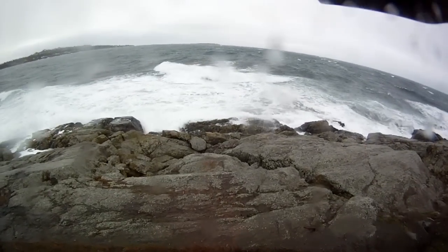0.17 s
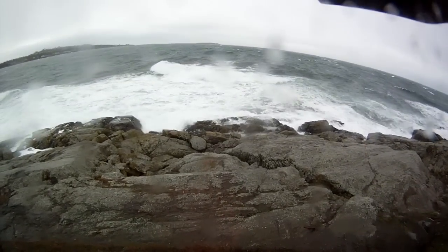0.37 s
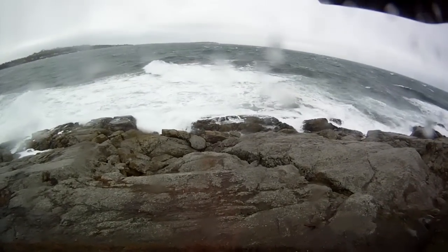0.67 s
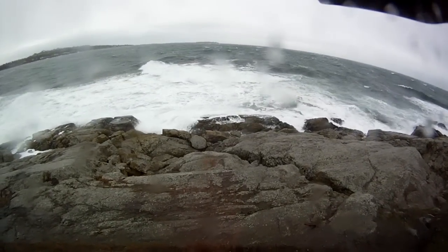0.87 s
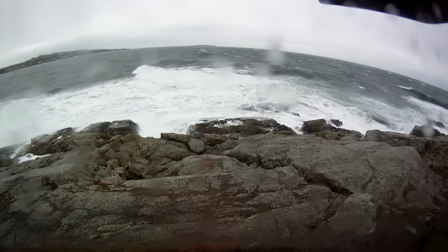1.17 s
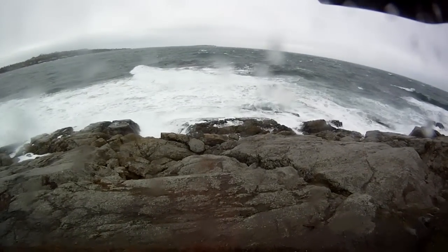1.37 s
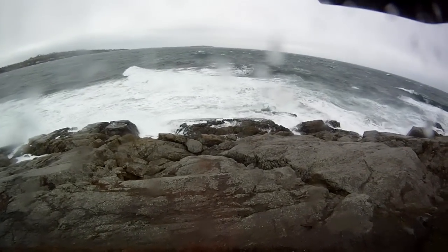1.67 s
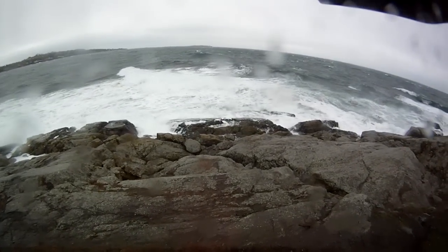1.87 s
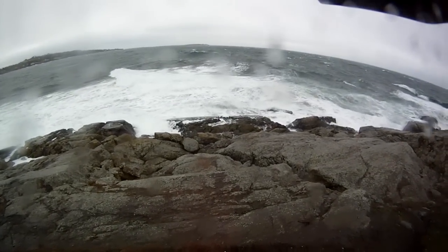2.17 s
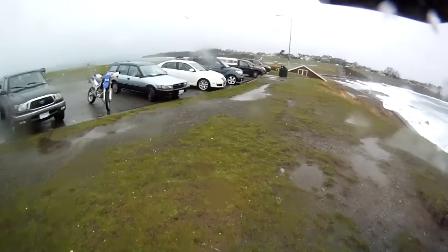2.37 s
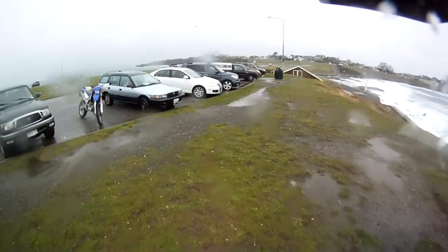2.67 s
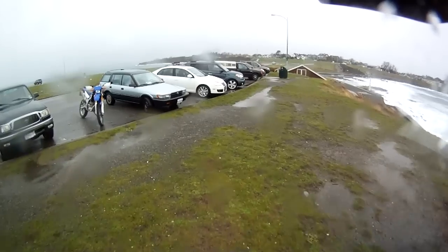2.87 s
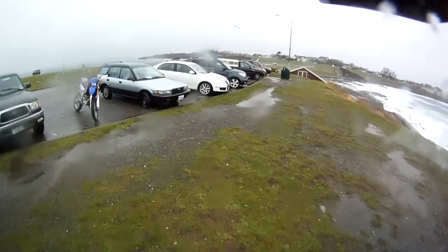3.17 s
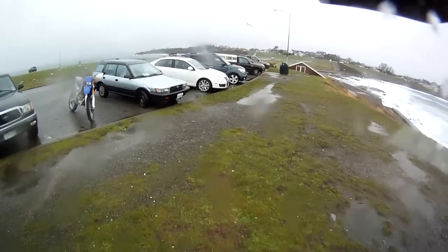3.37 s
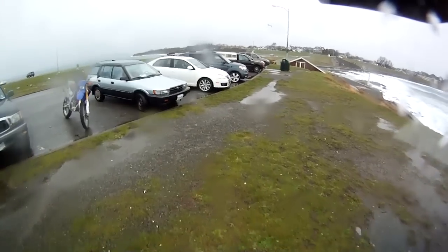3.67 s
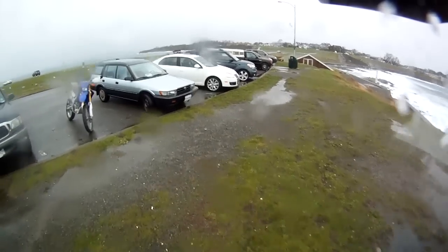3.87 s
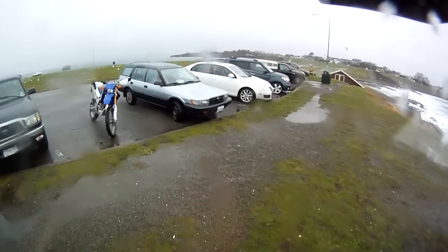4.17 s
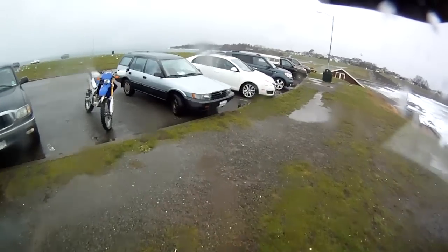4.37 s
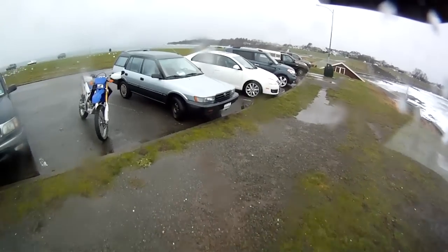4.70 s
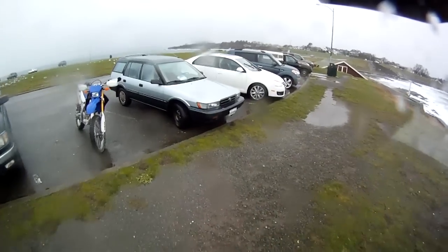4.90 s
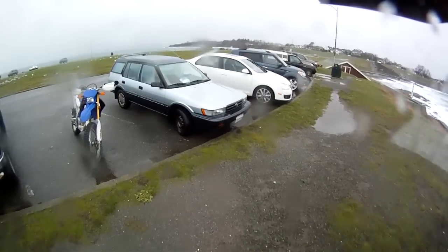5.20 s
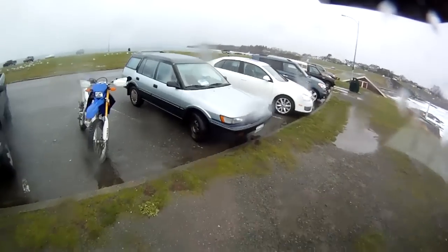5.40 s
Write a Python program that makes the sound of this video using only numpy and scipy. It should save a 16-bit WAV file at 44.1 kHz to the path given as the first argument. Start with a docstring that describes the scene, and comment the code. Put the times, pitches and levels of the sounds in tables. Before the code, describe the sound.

Strong wind rumbles and thumps on the microphone over roaring surf, with hissing spray and a few drops ticking close by.

```python
"""A rocky shore in a storm, heard through a small camera in a wet housing, on the rocks, then on the bank.
Wind thumps and rushes on the microphone, surf roars behind it, spray and bursts of rain hiss,
and a few drops tick on the housing. The recorder holds each sample at a low rate,
which mirrors the whole sound into a thin, high sizzle."""
import sys
import numpy as np
from scipy import signal
from scipy.fft import rfft, irfft
from scipy.io import wavfile
from scipy.ndimage import uniform_filter1d

SR = 44100
rng = np.random.default_rng(int(sys.argv[2]) if len(sys.argv) > 2 else 0)


def dump(signal):
    """Clip the signal to [-1, 1] and save it as 16-bit WAV at the path in sys.argv[1]."""
    limited = np.clip(np.atleast_2d(signal).T, -1, 1)
    pcm = np.round(limited * 32767).astype(np.int16)
    wavfile.write(sys.argv[1], SR, pcm)


N = 244314
TIME = np.arange(N) / SR
FREQUENCIES = np.fft.rfftfreq(N, 1 / SR)

# the average wind on the microphone (time [s], rumble [dB], rush [dB])
WIND_LEVELS = [(0.0, -21.5, -21), (0.11, -14, -22), (0.14, -20.5, -31), (0.26, -18.5, -24.5),
               (2.33, -18.5, -23.5), (2.41, -24.5, -28), (2.53, -21.5, -26), (4.55, -23.5, -28),
               (4.7, -21.5, -26.5), (5.54, -24, -26.5)]
# big swirls of air that hit or leave a lull (time [s], length [s], rumble change [dB], rush change [dB])
BIG_SWIRLS = [(0.11, 0.018, 1.5, -3), (0.376, 0.036, 4.5, 3), (0.696, 0.16, 2, 2.5),
              (0.927, 0.031, -5, 3.5), (0.998, 0.031, 4, 1), (1.198, 0.024, -4.5, -5.5),
              (1.324, 0.016, 4.5, 6.5), (1.7, 0.084, -2.5, -1), (1.87, 0.047, 1.5, 0), (2.04, 0.04, 3, 2),
              (2.277, 0.044, 1.5, -2.5), (2.854, 0.045, 0, 3.5), (3.185, .035, 3.5, 1.5),
              (3.284, 0.042, -7, 2.5), (3.48, 0.12, 2, 3), (3.68, 0.11, -4.5, -2), (3.923, .025, 2, 2.5),
              (4.838, 0.023, 5.5, 5.5), (5.04, 0.015, 5, -4), (5.196, 0.022, -1, 5)]
# short, hard gusts (time [s], length [s], level [dB])
GUSTS = [(0.087, 0.022, -25), (0.228, 0.014, -28), (4.857, 0.019, -26.5)]
# the sea from the rocks, then in three calm stretches from the bank (time [s], surf [dB], spray [dB])
SEA_FROM_ROCKS = [(0.0, -31, -40.5), (0.1, -36, -40.5), (0.12, -39, -51), (0.2, -39, -44),
                  (0.4, -31.5, -40), (0.69, -32.5, -44.5), (1.44, -32.5, -41), (2.34, -33.5, -45),
                  (2.37, -35.5, -46)]
SEA_FROM_BANK = [
    [(2.39, -38, -50), (2.394, -42, -48), (2.62, -43, -56.5)],
    [(3.6, -44, -55.5), (4.762, -40.5, -56.5), (4.78, -41, -55)],
    [(4.94, -42, -57), (5.032, -41, -52.5), (5.54, -38, -50.5)],
]
# bursts of fine rain (start [s], hold [s], hiss level [dB])
RAIN_BURSTS = [(2.645, 0.83, -52), (2.65, 0.016, -54.5), (3.053, 0.02, -52), (3.195, 0.011, -51),
               (3.314, 0.03, -51), (5.373, 0.08, -57)]
# drops on the housing (time [s], level [dB], splat length [s], knock boost [dB], tick boost [dB])
DROPS = [(1.0955, -40, .0015, 9, 5), (1.1455, -28, .0018, 11, -11), (1.2275, -31, .003, 12, -14),
         (1.5645, -36, .0016, 12, 0), (1.8572, -43, .0012, 0, 2), (2.3765, -37, .001, 0, 1),
         (3.7773, -45, .0012, -3, -2), (3.8357, -49, .001, 0, 0)]
# the tones the housing rings with (frequency [Hz], level [dB], time to fade by 60 dB [s])
HOUSING_TONES = [(2350, 0, .008), (4850, 0, .009), (5400, -3, .004)]
# the colour of each noise: how strong it is from low to high (frequency [Hz], level [dB])
RUMBLE_COLOUR = [(15, -14), (28, -4), (50, -0.5), (85, -1), (130, -3), (190, -5.5), (260, -18), (450, -43)]
RUSH_COLOUR = [(120, -22), (190, -1), (250, 0.5), (360, -3), (480, -7), (650, -16), (1000, -24),
               (2000, -36)]
GUST_COLOUR = [(100, -4), (300, 0), (600, -5), (1400, -8), (1900, -19), (3000, -32), (5000, -48)]
SURF_COLOUR = [(350, -5), (600, 2.5), (750, 0), (1100, -1.5), (1500, -6.5), (2000, -11.5), (3000, -19.5),
               (4200, -28), (5800, -34.5)]
SPRAY_COLOUR = [(1200, -1.5), (2000, 0.5), (2600, 2.5), (3300, 3), (3650, -1), (4100, -12), (4600, -11.5),
                (5050, -17.5), (5400, -11.5), (5900, -17.5)]
RAIN_COLOUR = [(1500, -16), (3000, -3), (4200, 2.5), (4700, -4.5), (5050, -13), (5400, -2), (5900, -11.5)]
SPLAT_COLOUR = [(1600, -9), (2300, 0), (3400, -2), (4500, -10), (5800, -13)]


def wind(small_swirls, flutter_db=0.5):
    """Big swirls of air thump on the microphone; small ones rush and flutter round the housing."""
    rumble_db, rush_db = curves(WIND_LEVELS)
    for time, length, rumble_change_db, rush_change_db in BIG_SWIRLS:
        rumble_db += rumble_change_db * swell(time, length)
        rush_db += rush_change_db * swell(time, length)
    rush_db += flutter_db * small_swirls
    rumble = from_db(rumble_db + 0.02) * steadied(noise(RUMBLE_COLOUR), span_s=0.11)
    rush = from_db(rush_db - 1.5) * steadied(noise(RUSH_COLOUR), span_s=0.27)
    return rumble + rush


def gusts():
    """Each hard gust tears at the housing for a moment."""
    loudness = sum(from_db(db) * swell(time, length) for time, length, db in GUSTS)
    return loudness * noise(GUST_COLOUR)


def surf(level_db, churn_db=0.55):
    """White water churns and roars on the rocks."""
    return from_db(level_db + churn_db * wobble(25)) * noise(SURF_COLOUR)


def spray(level_db, small_swirls, flutter_db=1.0):
    """Wet air hisses past, pulsing with the small swirls of wind."""
    return from_db(level_db + flutter_db * small_swirls) * noise(SPRAY_COLOUR)


def rain(attack_s=0.02, fade_s=0.085, spray_db=6.5, roar_db=12, flutter_db=1.5):
    """Fine rain arrives at once, holds and dies away: a bright hiss that brings spray and roar with it."""
    power = 0
    for start, hold, db in RAIN_BURSTS:
        corners = start + np.cumsum([0, attack_s, hold, fade_s])
        burst = from_db(db) * np.interp(TIME, corners, [0, 1, 1, 0])
        power += burst ** 2
    hiss = noise(RAIN_COLOUR)
    wet_air = from_db(spray_db) * noise(SPRAY_COLOUR)
    roar = from_db(roar_db) * noise(SURF_COLOUR)
    flutter = from_db(flutter_db * wobble(16))
    return np.sqrt(power) * flutter * (hiss + wet_air + roar)


def drops():
    """Drops splat on the housing: big ones knock its lowest tone, small hard ones tick the upper two."""
    splats, knocks, ticks = np.zeros((3, N))
    for time, db, length, knock_db, tick_db in DROPS:
        age = np.maximum(TIME - time, 0) / length
        splat = np.sqrt(2 * np.e) * age * np.exp(-age ** 2)   # rises to 1, then fades
        splats += from_db(db) * splat
        impact = int((time + length / 2) * SR)
        knocks[impact] = from_db(db + knock_db)
        ticks[impact] = from_db(db + tick_db)
    ringing = 0
    for clicks, (hz, db, fade_s) in zip((knocks, ticks, ticks), HOUSING_TONES):
        ringing += from_db(db) * ring(clicks, hz, fade_s)
    return splats * noise(SPLAT_COLOUR) + ringing


def ring(clicks, hz, fade_s):
    """Each click starts a pure tone that fades by 60 dB in fade_s seconds."""
    decay = from_db(-60 / (fade_s * SR))
    angle = 2 * np.pi * hz / SR
    return signal.lfilter([0, np.sin(angle)], [1, -2 * decay * np.cos(angle), decay ** 2], clicks + 1e-18)


def from_db(db):
    """Turn decibels into a number to multiply by."""
    return 10 ** (np.asarray(db) / 20)


def unit_level(sound):
    """Scale a sound so that its average power is 1."""
    return sound / np.sqrt(np.mean(sound ** 2) + 1e-20)


def curves(rows):
    """Join a table's points with straight lines: one curve for each level column."""
    times, *columns = np.transpose(rows)
    return [np.interp(TIME, times, column) for column in columns]


def swell(time, length):
    """A smooth rise to 1 and back around one moment."""
    return np.exp(-((TIME - time) / length) ** 2)


def wobble(rate_hz):
    """A smooth random curve that changes about rate_hz times a second."""
    spectrum = rfft(rng.standard_normal(N)) / (1 + (FREQUENCIES / rate_hz) ** 2)
    return unit_level(irfft(spectrum, N))


def noise(colour):
    """Noise of the given colour, falling away steeply beyond the ends of its table."""
    hz, db = np.transpose(colour)
    freqs = np.maximum(FREQUENCIES, 1)
    ends = np.minimum(freqs / hz[0], 1) ** 2 * np.minimum(hz[-1] / freqs, 1) ** 2
    gain = from_db(np.interp(np.log(freqs), np.log(hz), db)) * ends
    return unit_level(irfft(rfft(rng.standard_normal(N)) * gain, N))


def steadied(sound, span_s):
    """Even out the slow, chance swells in a noise."""
    power = uniform_filter1d(sound ** 2, int(span_s * SR))
    return sound / np.sqrt(np.maximum(power, 1e-9))


def low_pass(sound, edge_hz, order):
    """Keep what lies below edge_hz; a higher order cuts more sharply."""
    return irfft(rfft(sound) / np.sqrt(1 + (FREQUENCIES / edge_hz) ** (2 * order)), N)


def scene():
    """Wind, sea and rain at one microphone, first on the rocks and then on the bank above."""
    bank = np.vstack(SEA_FROM_BANK) + [0, 1, 0]   # lift the surf by 1 dB
    surf_db, spray_db = curves(np.vstack([SEA_FROM_ROCKS, bank]))
    small_swirls = wobble(26)   # shared, so wind and spray flutter together
    air = wind(small_swirls) + gusts()
    water = surf(surf_db) + spray(spray_db, small_swirls) + rain() + drops()
    return (air + water)[None]


def record(dry, hold_hz=12000, cutoff_hz=15300):
    """The recorder holds each sample, mirroring the sound around the hold rate, then cuts the very top."""
    narrow = low_pass(dry, hold_hz / 2 - 250, order=28)
    mirrored = narrow * (1 + 2 * np.cos(2 * np.pi * hold_hz * TIME))
    # holding weakens the mirrored sound most right at the hold rate
    held = irfft(rfft(mirrored) * np.sinc(FREQUENCIES / hold_hz), N)
    return low_pass(held, cutoff_hz, order=200)


dry = scene()
out = record(dry)
dump(out)
```